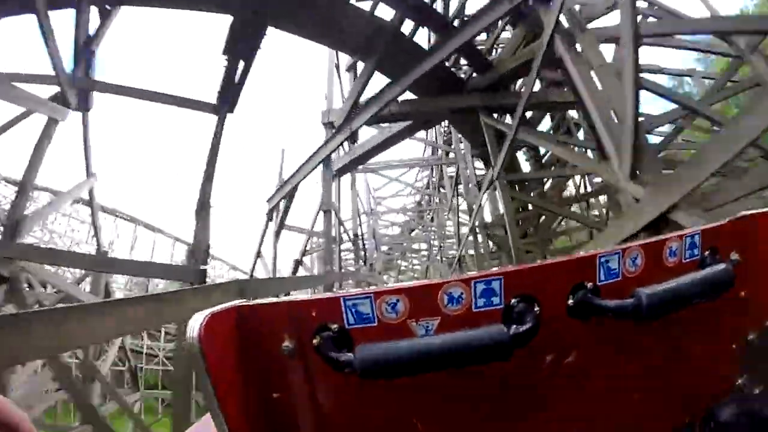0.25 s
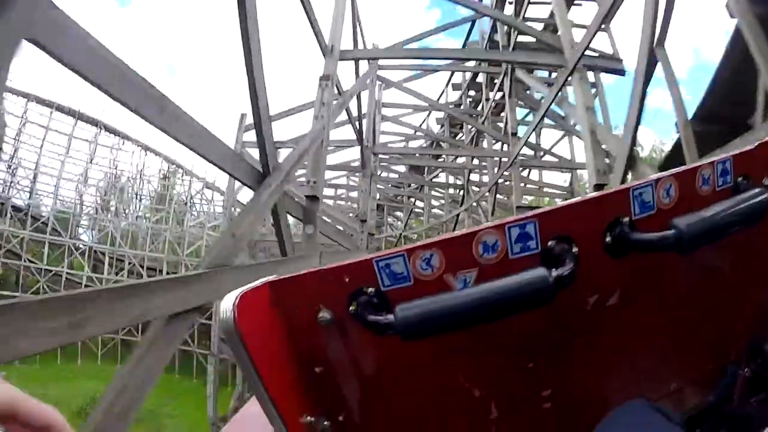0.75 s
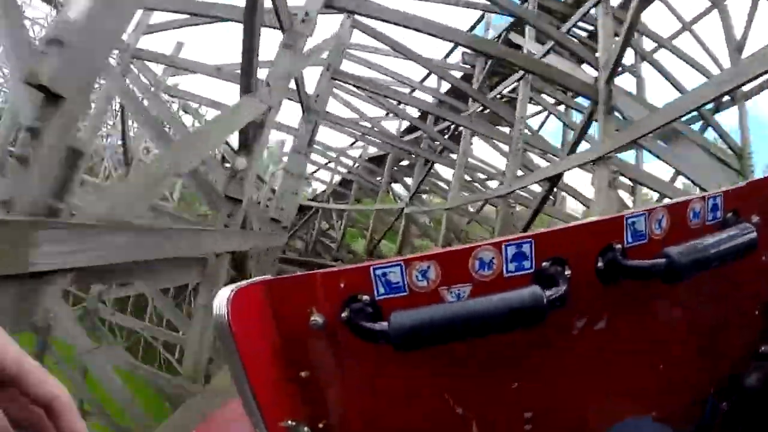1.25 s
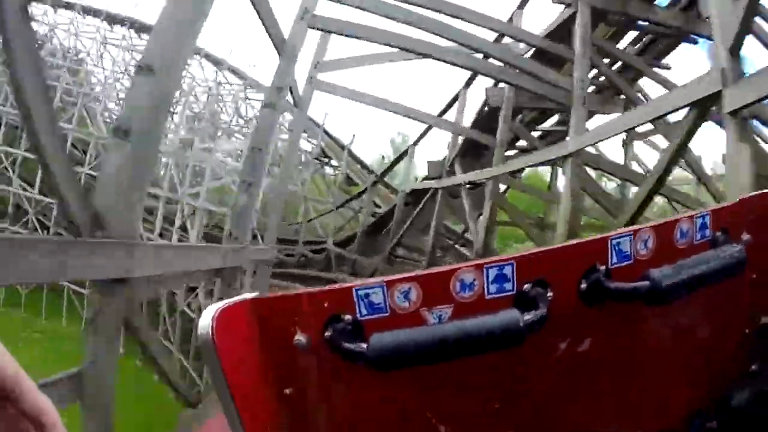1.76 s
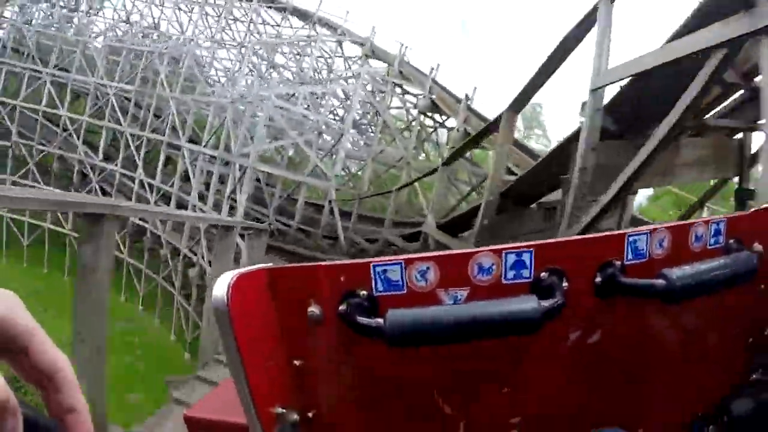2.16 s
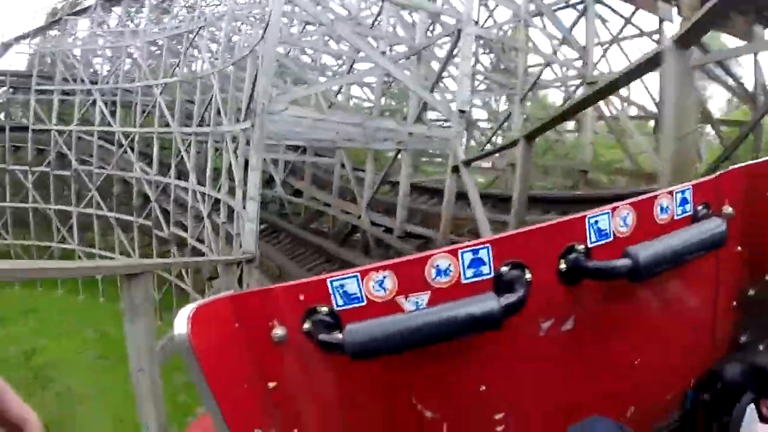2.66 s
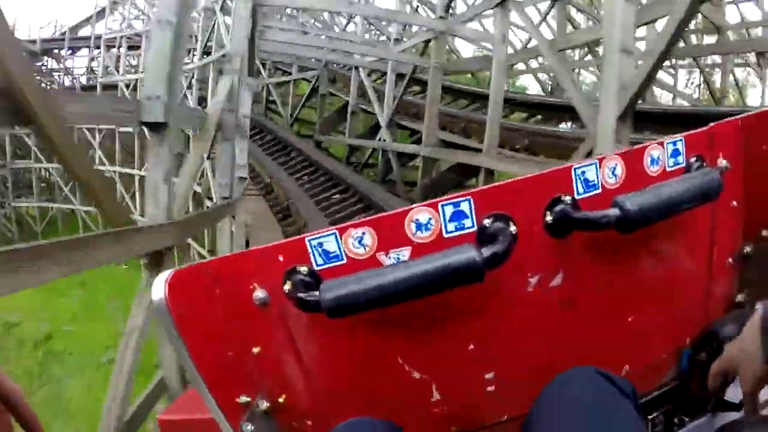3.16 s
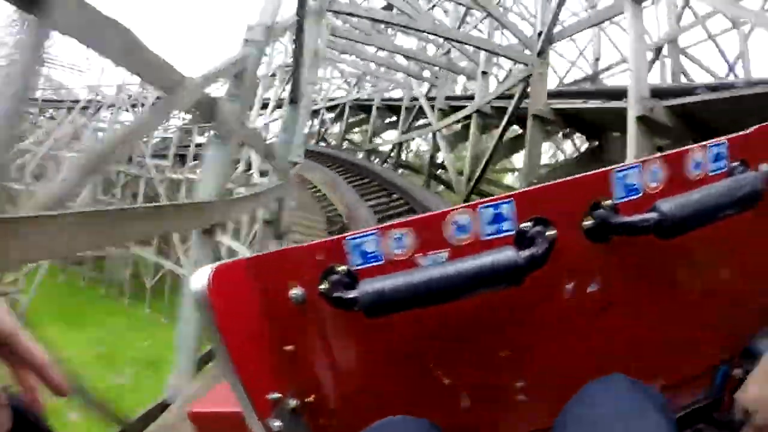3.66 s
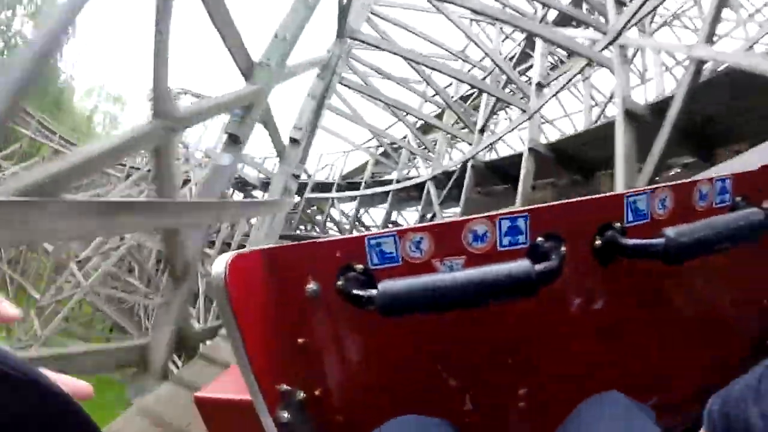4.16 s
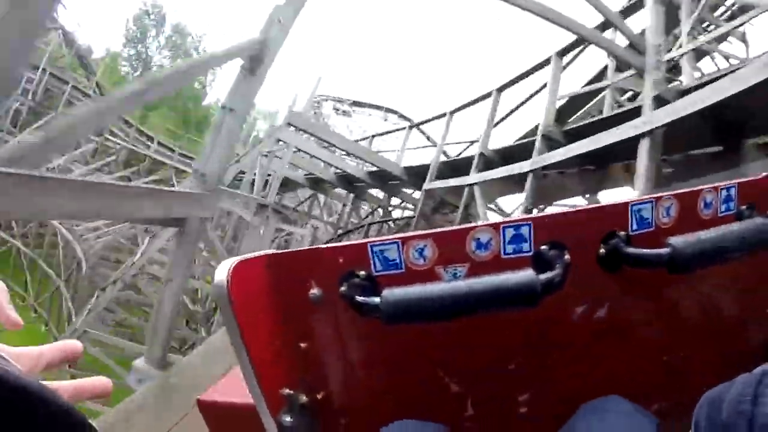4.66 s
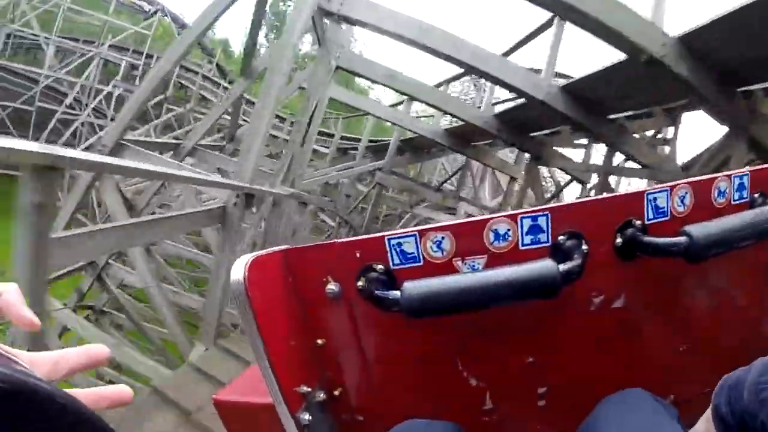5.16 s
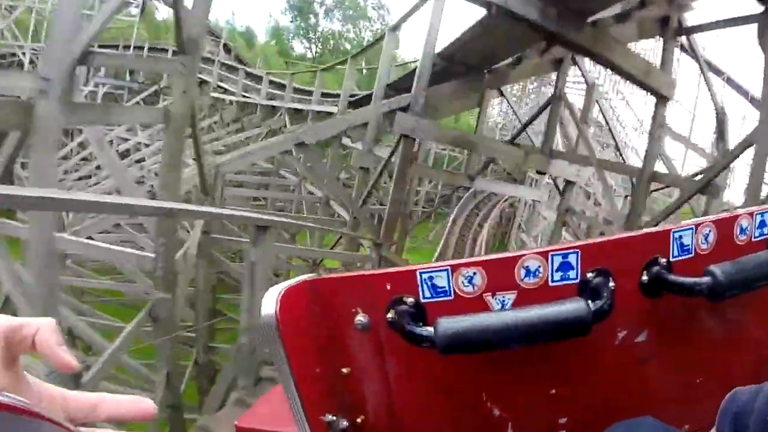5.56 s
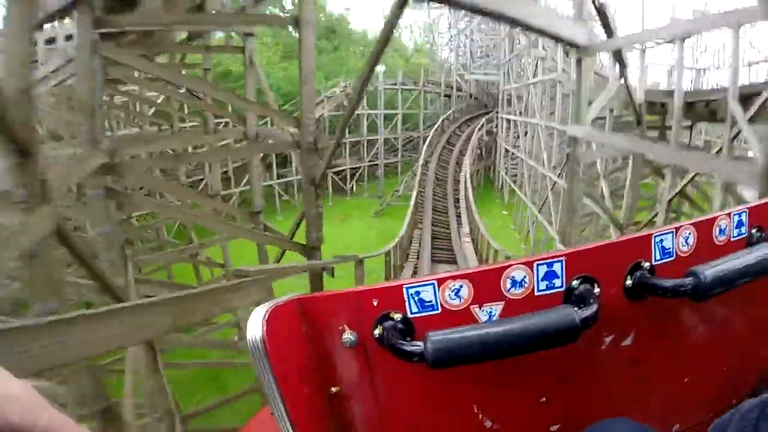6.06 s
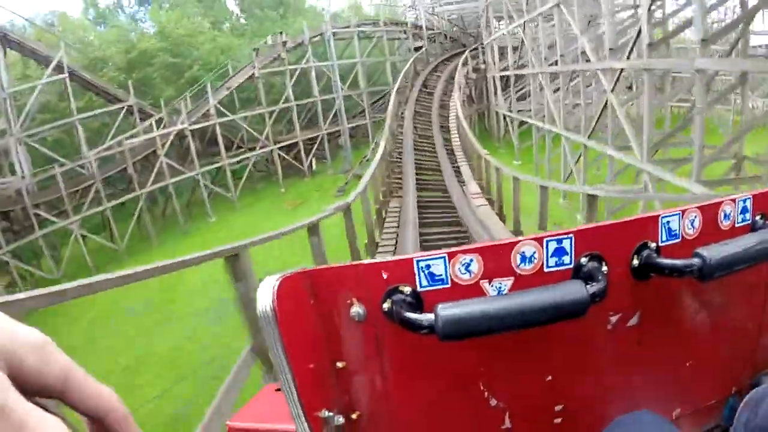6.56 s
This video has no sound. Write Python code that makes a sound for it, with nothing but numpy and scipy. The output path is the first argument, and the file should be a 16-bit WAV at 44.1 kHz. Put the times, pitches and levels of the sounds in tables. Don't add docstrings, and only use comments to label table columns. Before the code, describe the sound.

Close, boxy ride noise: blustery wind and wheel rumble, a dense burst of hard rattling clacks mid-ride, then quieter rolling and renewed gusts.

```python
import sys
import numpy as np
from scipy import signal
from scipy.fft import rfft, irfft
from scipy.io import wavfile
from scipy.ndimage import uniform_filter1d

SR = 44100
rng = np.random.default_rng(int(sys.argv[2]) if len(sys.argv) > 2 else 0)


def bounce(signal):
    frames = np.transpose(np.atleast_2d(signal))
    limited = np.clip(frames, -1, 1)
    pcm = np.round(limited * 32767).astype(np.int16)
    wavfile.write(sys.argv[1], SR, pcm)


def level_to_linear(level):
    exponent = np.asarray(level, float) / 20
    return 10 ** exponent


N = 300321

# t/s, level/dB, flatness/dB, hardness/dB, rattle/dB
HARD_BLOWS = [(1.4566, -14.5, -4.5, 5.5, -44), (1.5071, -9, -4, -18.5, -22), (1.6063, -4, 0, -9, -27),
              (1.8482, -22, -2, 4.5, -22), (1.8554, -11, -3.5, -21, -16), (1.906, -28, 0, -4, 0),
              (2.0417, -4, 0.4, -12.5, -22), (2.4201, -7.5, -1, -4, -13.5), (4.588, -14.5, -5.5, -11, -11),
              (4.9782, -13.5, -5.5, -7.5, -12), (2.592, -5.5, -37, -12, -26), (2.7082, -7, -1.5, -5, -24),
              (2.92, -18.5, -6.5, -9, -9), (3.2444, -5.5, -1.5, -4.5, -25), (3.4625, -28.5, 1.5, 8, -4),
              (3.7852, -9, -6.5, 1.5, -28), (4.0187, -17.5, -7.5, 3.5, -5.5), (4.305, -17, -3, 2.5, -9),
              (4.469, -7.5, -4, -3.5, -4.5), (4.7226, -12.5, -1.5, -7.5, -8), (4.8667, -15, -4, -8.5, -8),
              (5.176, -12, -3.5, -7, -31)]
# t/s, level/dB, flatness/dB, hardness/dB
BOUNCES = [(1.2939, -16, 0, -31), (1.738, -20.5, 2, -12), (1.742, -20, 2, -10), (1.746, -27, 1.2, -16),
           (1.7508, -32, 5, -10), (1.8392, -26, 0, 6.5), (2.433, -17.5, 5, 3), (2.46, -26, -12, -7),
           (2.5565, -7, 3.5, -11), (2.7142, -10.5, -26, -11), (2.7546, -26, -18, -22),
           (2.795, -24, -20, -21), (2.7999, -20, -1.5, -7.5), (2.8594, -35, 3, -24), (2.937, -48, 6, -17),
           (3.224, -27, -19, 3.5), (3.2492, -12, -3, -8.5), (4.5104, -26, -15, -5),
           (4.532, -22.5, -10, -14), (4.7683, -29, -3, -21), (5.052, -40, -4, -21), (5.13, -42, 0, -5),
           (5.45, -58, -3, -7), (5.565, -31.5, -7, -26), (6.147, -35, 14, -24), (3.008, -23.5, -8, -11)]
# t/s, level/dB, flatness/dB, hardness/dB
TICKS = [(1.6554, -41, 3, 12.5), (1.76, -33, 6.5, -9), (2.0502, -15.5, 1.5, -12), (2.4985, -22.5, 4.5, -23),
         (2.683, -26.5, -1, 4.5), (2.69, -36, 3, 4), (2.721, -18, -26, -18), (2.8264, -30, -11, -25),
         (2.837, -24, -3, -17), (2.9508, -37, -1, -14), (4.0354, -42.5, 0, 2), (4.3133, -21, -14, -1),
         (4.3978, -31, -17, -9), (4.421, -27.5, -11, 1.2), (4.4761, -12, -9, -9), (4.547, -19, -25, -18),
         (4.658, -32, -14, -17), (4.846, -52, -1.2, 2.2), (4.857, -26, -9, -24), (5.0172, -34.5, 0, -25),
         (6.312, -40, 11, -2)]
# t/s, level/dB, flatness/dB, hardness/dB, rattle/dB
RIM_BLOWS = [
    (1.4752, -18.5, -13, 7, -43),
    (1.486, -26.5, -16, 2, -10),
    (1.649, -34, -10, 3, -20),
    (1.722, -7, 5, -6.5, -27),
    (2.427, -3.5, -8, -12.5, -11),
    (2.545, -6.5, 2.5, -11, -26),
    (2.575, -24, -2.2, -18, -26),
    (2.9697, -42, 0, -14, -11),
]
# f/Hz, level/dB, t60/s
CASE_GROUPS = [
    [(1323, -2.5, 0.025), (1482, -4, 0.014), (1080, -36, 0.002), (1660, -16.5, 0.0075)],
    [(2385, 9.5, 0.012), (2280, -1.5, 0.033), (1690, -22, 0.0048)],
    [(3353, 4, 0.0084), (3830, -2.5, 0.016), (2720, -21, 0.014)],
    [(4950, 6.5, 0.0078), (5440, -6, 0.0017), (6070, 0, 0.0014), (6880, -5, 0.0045), (10680, -15, 0.0011),
     (11700, -20, 0.00185)],
]
# t/s, peak level/dB, ring f/Hz, edge level/dB
SEAT_KNOCKS = [
    (1.292, -3.5, 273, -10.5),
    (1.559, -26, 310, -5),
    (2.496, -20.5, 263, -15),
    (3.622, -13.5, 277, 0.5),
    (3.72, -13, 284, -6),
    (4.213, -14.5, 302, -2.5),
    (5.563, -10.5, 290, -9.5),
    (6.145, -6.5, 285, -0.5),
]
# t/s, level/dB
AIRFLOW = [(0, -10.5), (.3, -17.5), (.5, -18.5), (1.29, -14.5), (1.36, -25), (1.43, -29), (1.48, -33),
           (2.05, -38.5), (2.2, -28), (3.0, -38.5), (3.5, -33), (3.68, -26.5), (3.85, -35), (4.3, -25),
           (4.8, -36.5), (5.3, -36.5), (6.05, -27), (6.81, -13)]
# t/s, level over the airflow/dB, half
# length/s
GUSTS = [(0.117, 2.5, 0.042), (.32, -7, 0.026), (0.412, 10, 0.043), (.62, 6, 0.019), (0.687, -6, 0.036),
         (0.803, -3.5, 0.068), (1.135, -14, 0.022), (1.656, 8, .03), (1.806, 14, 0.031),
         (3.212, 5.5, 0.042), (3.27, -6, 0.034), (5.234, -10, 0.034), (6.137, 4.5, 0.032),
         (6.198, -10, 0.029), (6.283, 7.5, 0.033), (6.545, 7, 0.034), (6.68, -15, 0.016), (6.721, 1, .015),
         (6.793, 0.5, .015), (5.952, 4.5, 0.054)]
# f/Hz, level per Hz/dB
BUFFET_COLOUR = [(8, -3), (15, 11.5), (36, 3), (70, -4), (130, -8.5), (200, -24.5), (400, -35),
                 (3000, -70.5)]
# t/s, peak level/dB, length/s, hiss share/dB
WIND_SLAPS = [(0.053, -20, 0.026, -8), (0.136, -12, 0.0087, -14), (0.379, -6.5, 0.013, -19),
              (0.525, -13.5, 0.024, -6.5), (0.59, -38, 0.0089, -10), (0.636, -28, 0.0094, -25),
              (0.789, -21, 0.01, -3), (0.973, -33, 0.019, -15), (1.201, -16.5, 0.016, -6.5),
              (1.259, -19, 0.013, -8), (5.747, -22, 0.0056, -26), (6.108, -16, 0.0063, -38),
              (6.308, -5, 0.0088, -19.5), (6.44, -19, 0.015, -19), (6.563, -12.5, 0.012, -24),
              (6.653, -18.5, 0.011, -29), (6.79, -14, 0.021, -20)]
# t/s, level/dB
WHEEL_LOAD = [(0, -27), (.45, -31), (.52, -27), (1.29, -26), (1.35, -34.5), (1.43, -36), (1.48, -43.5),
              (2.05, -43.5), (2.4, -39.5), (3.03, -45.5), (3.12, -40), (3.42, -47.5), (3.7, -38),
              (3.85, -45), (4.42, -35), (4.58, -44), (5.35, -43), (6.35, -31.5)]
# f/Hz, width/Hz, level/dB
ROAR_RESONANCES = [(1336, 330, -0.5), (2285, 420, -14.5), (860, 450, -7), (1774, 790, -8)]
# f/Hz, level per Hz/dB
RUMBLE_COLOUR = [(60, 2), (130, 3), (190, -2), (265, -1.5), (400, -2.5), (620, -11), (900, -21.5),
                 (1500, -34.5), (4000, -61)]
# f/Hz, level per Hz/dB
HISS_COLOUR = [(1800, 0.5), (2700, -4.5), (3100, -4.5), (3600, 1), (4400, -7.5), (6000, -10), (7500, -16.5),
               (8600, -27), (9000, -25.5), (10200, -32.5), (11100, -28.5), (12800, -36), (14200, -48),
               (16000, -71.5)]
# t/s, pitch f/Hz, pressure level/dB
FLANGE_RUB = [(0, 2246, -39), (1.2, 2223, -38.5), (1.55, 2225, -53), (2.6, 2243, -52.5), (3.35, 2073, -51),
              (3.7, 2063, -41), (3.83, 2090, -54), (4.0, 2040, -47), (4.451, 2080, -37), (4.7, 2113, -47),
              (5.25, 2067, -51.5), (5.75, 2079, -42.5), (6.81, 2152, -44)]


def unit(x):
    return x / np.sqrt(np.mean(x ** 2))


def walk(rate):
    hold = max(int(SR / rate), 1)
    steps = np.repeat(rng.standard_normal(N // hold + 1), hold)
    smooth = uniform_filter1d(uniform_filter1d(steps, hold), hold)
    return unit(smooth[:N])


def colour(x, table):
    hz, db = np.transpose(table)
    f = np.maximum(np.arange(len(x) // 2 + 1) * SR / len(x), 1)
    gain = level_to_linear(np.interp(np.log(f), np.log(hz), db, left=-90, right=-140))
    return unit(irfft(rfft(x) * gain, len(x)))


def ring(x, hz, t60):
    pole = np.exp(2j * np.pi * hz / SR - np.log(1000) / (t60 * SR))
    return signal.lfilter([1], [1, -pole], x).imag


def add(out, s, sound):
    i = int(s * SR)
    out[i:i + len(sound)] += sound[:N - i]


def grit(rate, spread_db):
    return rng.standard_normal(N) * level_to_linear(spread_db * walk(rate))


def strike_group(group, contact):
    chatter = rng.standard_normal(len(contact)) * contact
    grip_level, grip_pitch = rng.standard_normal((2, len(group)))
    sound = 0
    for k, (hz, db, t60) in enumerate(group):
        soft_start = ring(chatter, hz, 0.0012)
        mode = ring(soft_start, hz * (1 + 0.015 * grip_pitch[k]), t60)
        sound = sound + level_to_linear(db + 3.0 * grip_level[k]) * unit(mode)
    return sound / np.sqrt(np.mean(sound[:170] ** 2))


def clacks():
    out, t = np.zeros(N), np.arange(1400) / SR
    blows = [(*b, 0) for b in HARD_BLOWS]
    blows += [(*b, -22, 0) for b in BOUNCES]
    blows += [(*b, -6, 0) for b in TICKS]
    blows += [(*b, 7) for b in RIM_BLOWS]
    rattle_loss_db = np.array([[0], [0], [0], [-6]])
    for s, blow_db, flat_db, hard_db, rattle_db, rim_db in blows:
        upper_db = -2.5 + 0.54 * hard_db + rim_db
        levels_db = blow_db + np.array([flat_db, 0, upper_db, hard_db])
        first_contact = np.exp(-(t / 0.0013) ** 2)
        rattle = level_to_linear(rattle_db + rattle_loss_db) * np.exp(-(t / 0.0062) ** 2)
        contacts = (first_contact + rattle) * (1 - np.exp(-t / 0.00008))
        for group, level_db, contact in zip(CASE_GROUPS, levels_db, contacts):
            add(out, s + 0.0001, strike_group(group, contact) * level_to_linear(level_db - 1.5))
    out = signal.sosfilt(signal.butter(2, 850, "high", fs=SR, output="sos"), out)
    out = signal.sosfilt(signal.butter(1, 11000, fs=SR, output="sos"), out)
    thud_band = signal.butter(1, [150, 800], "band", fs=SR, output="sos")
    thud = signal.sosfilt(thud_band, np.minimum(out ** 2, 1))
    return out - 0.24 * thud


def knocks():
    out, t = np.zeros(N), np.arange(3000) / SR
    edge = 0
    for hz, gain, decay_s in [(455, 1.0, 0.0013), (737, 0.62, 0.0016), (975, 0.3, 0.004), (2145, 0.12, 0.0039)]:
        edge = edge + gain * np.exp(-t / decay_s) * np.sin(2 * np.pi * hz * t)
    onset = 1 - np.exp(-t / 0.00027)
    for s, db, hz, edge_db in SEAT_KNOCKS:
        body = np.exp(-t / 0.0043) * np.sin(2 * np.pi * hz * t)
        add(out, s + 0.00255, -level_to_linear(db + 3.0) * onset * (body + level_to_linear(edge_db) * edge))
    return out


def airflow_level(t):
    wind_db = np.interp(t, *np.transpose(AIRFLOW)) + 2 * walk(14)
    for s, db, half in GUSTS:
        wind_db += db * np.exp(-((t - s) / half) ** 2)
    return wind_db


def wind_buffet(wind_db):
    return colour(grit(30, 0.72), BUFFET_COLOUR) * level_to_linear(wind_db)


def slaps():
    out, t = np.zeros((2, N)), np.arange(5000) / SR
    for s, db, length, hiss_db in WIND_SLAPS:
        bump = level_to_linear(db - 8.5) * (t / length) ** 0.29 * np.exp(-t / length)
        add(out[0], s, bump)
        add(out[1], s, bump * level_to_linear(hiss_db))
    return out


def wheel_roar(eddy):
    roar = 0
    for hz, width, db in ROAR_RESONANCES:
        t60 = np.log(1000) / np.pi / width
        once = ring(grit(150, 2.4) * level_to_linear(0.51 * eddy), hz, t60)
        roar = roar + level_to_linear(db) * unit(ring(once, hz, t60))
    return unit(roar)


def shaken_case(roar_db, eddy):
    load = roar_db + 35
    rumble_db = -36.5 + 0.87 * load
    hiss_db = -51.5 + 1.035 * load
    rumble = colour(grit(70, 2.6) * level_to_linear(2.1 * eddy), RUMBLE_COLOUR)
    roar = wheel_roar(eddy)
    hiss = colour(grit(200, 1.2) * level_to_linear(1.5 * eddy), HISS_COLOUR)
    steady = roar * level_to_linear(roar_db - 1.17) + rumble * level_to_linear(rumble_db + 2.5) + hiss * level_to_linear(hiss_db + 2.5)
    slap_body, slap_hiss = slaps()
    return steady + slap_body * (roar + 0.91 * rumble) + slap_hiss * hiss


def sway(hz, width):
    phase = 2 * np.pi * np.cumsum(hz) / SR
    return unit(walk(width) * np.sin(phase) + walk(width) * np.cos(phase))


def flange_whine(t):
    s, pitch, pressure = np.transpose(FLANGE_RUB)
    hz = np.interp(t, s, pitch) * (1 + 0.015 * walk(9))
    tone = sway(hz, 420)
    db = np.interp(t, s, pressure) - 1.0 + 1.6 * walk(55) + 2.2 * walk(11)
    return tone * level_to_linear(db)


def scene():
    t = np.arange(N) / SR
    hits = clacks() + knocks()
    wind_db = airflow_level(t)
    roar_db = np.interp(t, *np.transpose(WHEEL_LOAD)) + 0.97 * walk(12)
    eddy = walk(45)
    ride = wind_buffet(wind_db) + shaken_case(roar_db, eddy) + flange_whine(t)
    held = signal.lfilter([1 / (0.016 * SR)], [1, 1 / (0.024 * SR) - 1], hits ** 2)
    late = np.roll(held, int(0.0029 * SR))
    mix = ride / np.sqrt(1 + held / 0.018) + hits / np.sqrt(1 + late / 0.038)
    return mix[None]


def roll_off(x):
    return signal.sosfilt(signal.butter(12, 16400, fs=SR, output="sos"), x)


def record(dry):
    full_scale, knee = 0.95, 10.0
    clipped = dry / (1 + np.abs(dry / full_scale) ** knee) ** (1 / knee)
    finished = signal.sosfilt(signal.butter(2, 12000, fs=SR, output="sos"), clipped)
    return roll_off(finished)


dry = scene()
out = record(dry)
bounce(out)
```